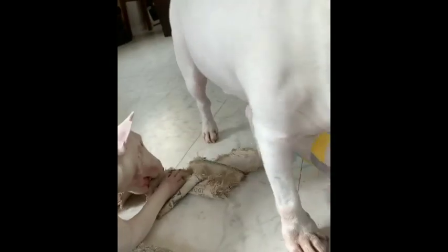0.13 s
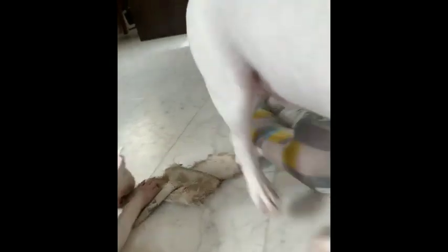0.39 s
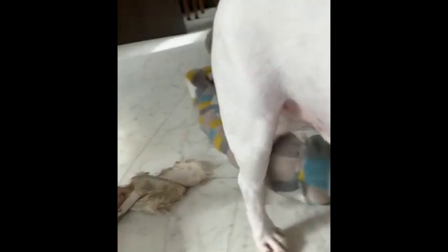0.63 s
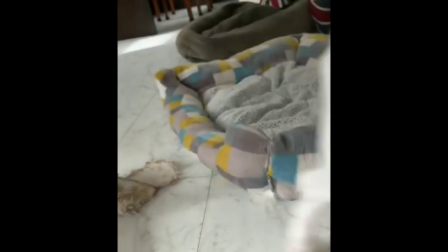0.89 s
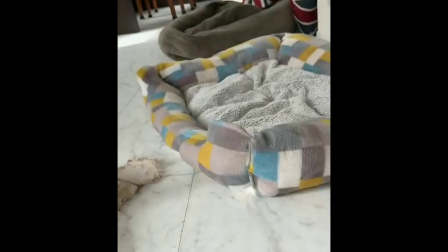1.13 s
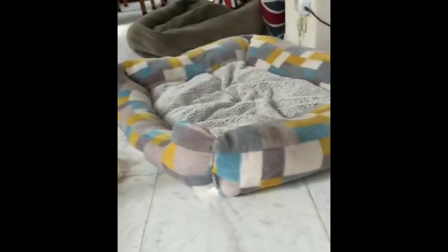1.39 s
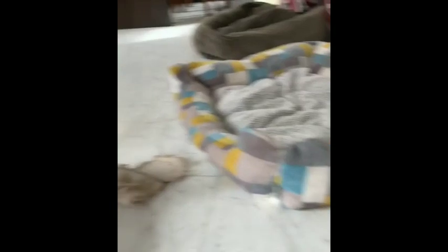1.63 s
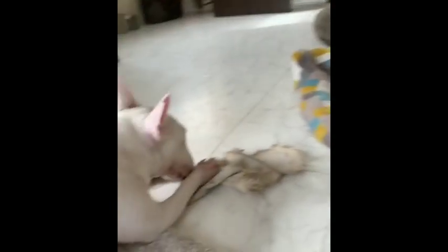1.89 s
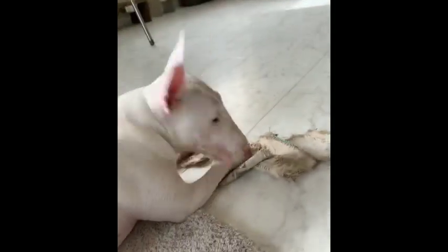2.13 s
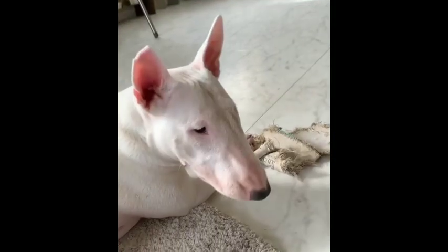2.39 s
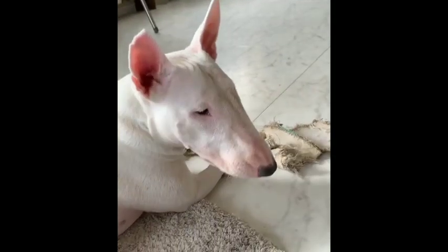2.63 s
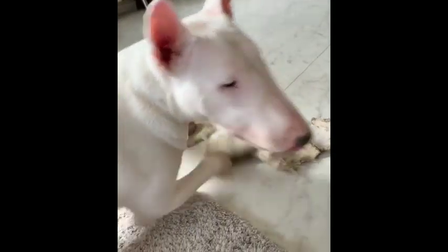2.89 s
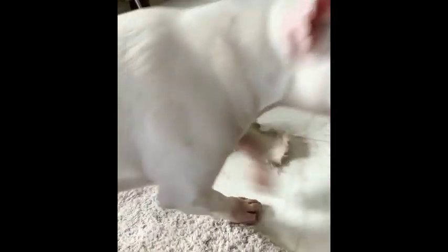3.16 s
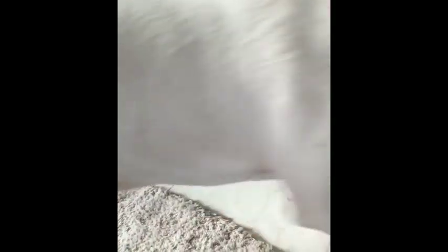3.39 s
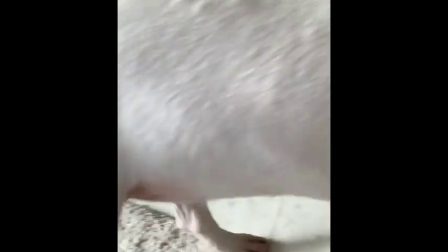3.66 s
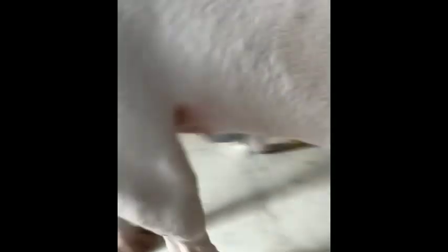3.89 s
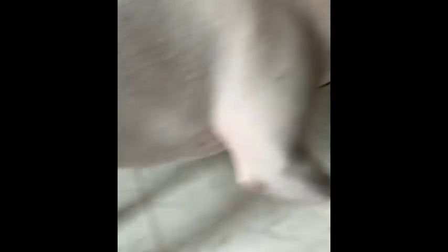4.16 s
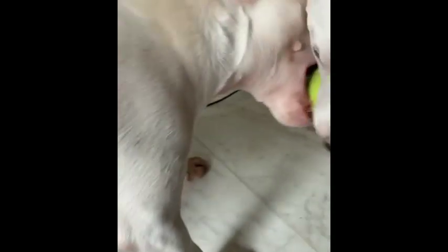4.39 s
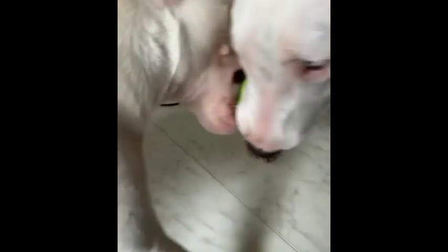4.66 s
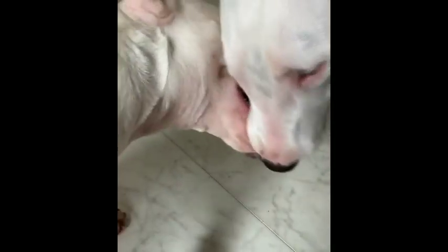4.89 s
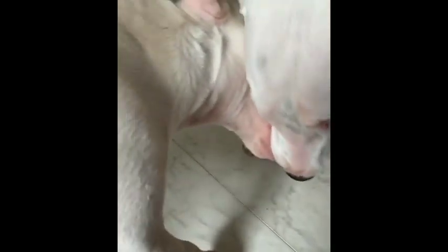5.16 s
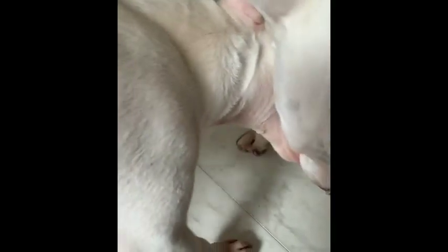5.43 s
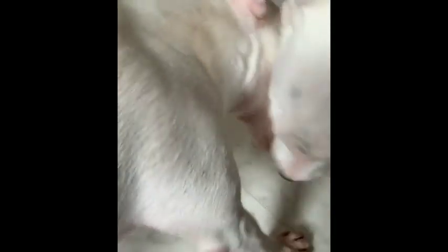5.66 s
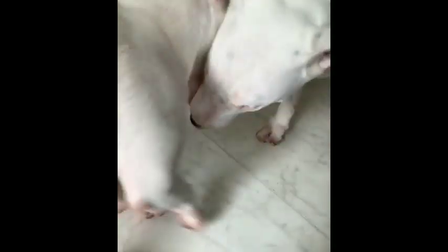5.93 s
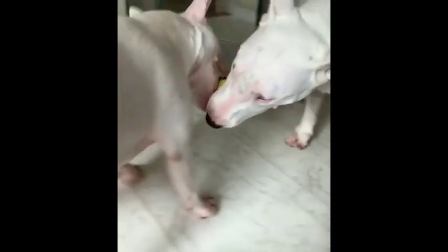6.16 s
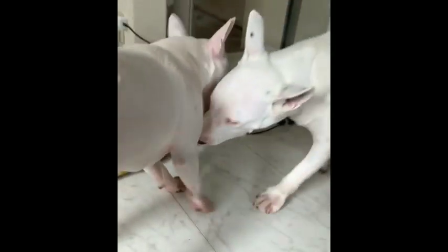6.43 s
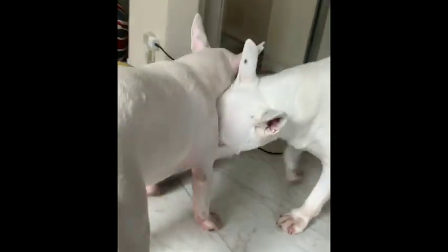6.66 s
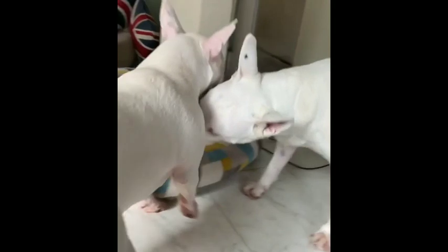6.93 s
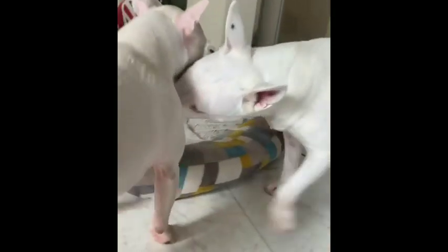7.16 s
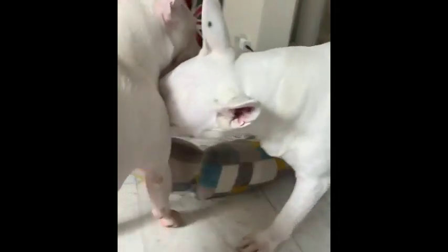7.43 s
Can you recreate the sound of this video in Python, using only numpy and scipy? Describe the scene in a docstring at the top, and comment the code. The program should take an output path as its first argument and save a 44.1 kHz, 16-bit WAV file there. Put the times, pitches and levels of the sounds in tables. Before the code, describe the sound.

Two dogs scuffle on a hard indoor floor, claws ticking and paws scuffing and thudding, with soft huffs, a nasal grunt and a brief rough growl.

```python
"""Two dogs scuffle on a stone floor in a living room, under steady room tone, brushing fur and rustling bedding.
First claws (short noise through resonances) tick over scuffs (grain noise) and thuds (sagging sines), with huffs
(breath noise and loose slaps through a snout); a sparser spell ends in a hard thud just after 3 s.
A nasal grunt (rough hum) comes at 4.1 s, then hard claw clusters; from 5.1 to 5.5 s one dog growls in rough
throbs (slaps and air bursts through throat and chest); bright claw clusters, scuffs and thuds run to the end."""
import sys
import numpy as np
from scipy import signal
from scipy.fft import rfft, irfft, next_fast_len
from scipy.io import wavfile

SR = 44100
rng = np.random.default_rng(int(sys.argv[2]) if len(sys.argv) > 2 else 0)


def level_to_linear(level):
    """Convert decibel levels to linear amplitude factors, elementwise."""
    exponent = np.asarray(level, float) / 20
    return 10 ** exponent


def store_wav(level_fs):
    """Save 16-bit WAV to argv[1]."""
    pcm = np.round(np.clip(np.atleast_2d(level_fs), -1, 1) * 32767)
    wavfile.write(sys.argv[1], SR, pcm.T.astype(np.int16))


N = 332955

# Chest resonances. Each row: frequency in Hz, width in Hz, level in dB.
CHEST_MODES = [(79, 39.5, -3), (135, 76, -1), (200, 78, -2), (314, 47, -8.5), (486, 68, -11)]


def rms_one(x):
    """Scale to rms 1."""
    return x / np.sqrt(np.mean(x ** 2) + 1e-20)


def in_time(rows, outside=None):
    """Columns of a curve table, one value per sample."""
    s, *columns = np.transpose(rows)
    return [np.interp(np.arange(N) / SR, s, c, outside, outside) for c in columns]


def drift(rate):
    """Slow chance: smooth noise, spread 1, made on every 40th sample."""
    r = np.exp(-80 * np.pi * rate / SR)
    white = rng.standard_normal(N // 40 + 2002)
    slow = signal.lfilter([1], [1, -2 * r, r * r], white)[2000:]
    return np.interp(np.arange(N) / 40, np.arange(len(slow)), rms_one(slow))


def coloured(spectrum, white):
    """Give a white signal the spectrum; rms 1."""
    hz, db = np.transpose(spectrum)
    log_hz = np.log(np.fft.rfftfreq(N, 1 / SR) + 1)
    gain = level_to_linear(np.interp(log_hz, np.log(hz), db, -70, -70))
    return rms_one(irfft(rfft(white) * gain, N))


def resonate(x, hz, width_hz):
    """One resonance, gain 1 on top."""
    r = np.exp(-np.pi * width_hz / SR)
    poles = [1, -2 * r * np.cos(2 * np.pi * hz / SR), r * r]
    return signal.lfilter([(1 - r * r) / 2, 0, (r * r - 1) / 2], poles, x)


def cavity(x, modes):
    """Resonances in parallel, signs alternating."""
    return sum((-1) ** k * level_to_linear(db) * resonate(x, hz, width_hz) for k, (hz, width_hz, db) in enumerate(modes))


def burst(length, rise_s, fall_s):
    """An envelope of height 1 that swells fast and dies away."""
    t = np.arange(length) / SR
    shape = (1 - np.exp(-t / rise_s)) ** 2 * np.exp(-t / fall_s)
    return shape / shape.max()


def add(out, s, piece):
    """Lay a short sound into out at time s."""
    i = round(s * SR)
    out[:, i:i + piece.shape[1]] += piece[:, :N - i]


def room_tone():
    """Steady dark noise whose level wanders slowly."""
    # Each row: frequency in Hz, relative density in dB per Hz.
    tone_spectrum = [(30, -2), (110, 4.5), (250, -1), (500, -15), (900, -30.5), (2000, -40), (3300, -42),
                     (5500, -44), (9000, -41), (13150, -55), (13400, -64)]
    return level_to_linear(-63.5 + 2.6 * drift(4.4)) * coloured(tone_spectrum, rng.standard_normal((2, N)))


def room(x):
    """Eight feedback delays a side, duller on every round."""
    low_t60_s, wall_cut_hz = 0.4, 4000
    size = next_fast_len(N + SR)
    w = 2 * np.pi * np.fft.rfftfreq(size)
    dull = 1 / (1 + 1j * w * SR / (2 * np.pi * wall_cut_hz))
    echo = np.zeros((2, len(w)), complex)
    for k, lag in enumerate(rng.uniform(0.0098, 0.04, 16) * SR):
        loop = level_to_linear(-60 * lag / SR / low_t60_s) * dull ** 0.49 * np.exp(-1j * w * lag)
        echo[k % 2] += (-1) ** (k // 2) * loop / (1 - loop)
    return irfft(rfft(x, size) * echo, size)[:, :N]


def friction(spectrum, level_db, grain_db, lumpy_db, patchy_db, lumps_per_s, count):
    """Dense grains of uneven size, coming in lumps; count bands an octave each swell and fade on their own."""
    sizes = level_to_linear(grain_db * np.minimum(rng.exponential(1, N), 5))
    grains = rfft(coloured(spectrum, sizes * rng.standard_normal((2, N))))
    band = count * np.log2(np.fft.rfftfreq(N, 1 / SR) + 1)
    first, last = np.round(count * np.log2([spectrum[0][0], spectrum[-1][0]]))
    patches = 0
    for k in np.arange(first, last + 1, 1):
        one_band = irfft(grains * np.clip(1 - abs(band - k), 0, 1), N)
        patches = patches + level_to_linear(patchy_db * drift(15.3)) * one_band
    return level_to_linear(level_db + lumpy_db * drift(lumps_per_s)) * patches


def shuffle():
    """Bodies shifting their weight: low friction noise."""
    # Each row: frequency in Hz, relative density in dB per Hz.
    shuffle_spectrum = [(25, -71), (45, -11), (70, 2), (110, -1), (200, -1.5), (300, -11.5), (450, -5.5),
                        (700, -27), (1200, -87)]
    # Each row: time in seconds, level in dB before lumps and patches.
    shuffle_levels = [(0.0, -59), (0.635, -58.5), (0.99, -61.5), (1.67, -55.5), (2.58, -60), (3.13, -57.5),
                      (4.055, -56), (4.165, -56.5), (4.55, -58.5), (4.94, -57), (5.025, -53),
                      (6.165, -53.5), (6.545, -57.5), (7.545, -53.5)]
    return friction(shuffle_spectrum, in_time(shuffle_levels)[0],
                    grain_db=3.0, lumpy_db=2.2, patchy_db=1.8, lumps_per_s=12, count=2)


def rustle(scuff_power):
    """Bedding and skin: mid-band friction, stirred further by each scuff."""
    # Each row: frequency in Hz, relative density in dB per Hz.
    rustle_spectrum = [(300, -4), (600, 11.5), (1000, 7.5), (1500, 3.5), (2200, -1.5), (4000, -101)]
    # Each row: time in seconds, level in dB before scuffs, lumps and patches.
    rustle_levels = [(0.0, -72.5), (0.765, -61), (1.365, -66), (1.6, -54.5), (1.775, -72), (1.93, -69.5),
                     (2.905, -69.5), (3.75, -66), (4.345, -71.5), (4.8, -70), (5.57, -61), (6.29, -67),
                     (6.89, -65.5), (7.15, -70), (7.545, -62)]
    per_scuff_db = -7.5
    power = level_to_linear(2 * per_scuff_db) * scuff_power[0] + level_to_linear(2 * in_time(rustle_levels)[0])
    return friction(rustle_spectrum, 10 * np.log10(power),
                    grain_db=4.5, lumpy_db=2.2, patchy_db=4.0, lumps_per_s=45, count=4)


def scuffing():
    """Each scuff swells quickly, sags while the pad slides, then lets go: coarse and fine level as power."""
    # Pads sliding on stone. Each row: start of slide in seconds, coarse level in dB, fine level in dB,
    # length in seconds.
    slides = [(0.118, -56, -70, 0.015), (0.78, -57.5, -62.5, 0.025), (0.95, -59, -81, 0.013),
              (1.081, -57.5, -90, 0.058), (1.256, -63, -61.5, 0.18), (1.437, -57.5, -70, 0.18),
              (1.569, -63, -61, 0.02), (2.173, -64.5, -74.5, 0.077), (2.43, -63.5, -76, 0.23),
              (2.724, -62, -79, 0.013), (2.993, -46, -47, 0.048), (3.1, -56, -60, 0.075),
              (3.399, -57.5, -60, 0.054), (3.605, -56.5, -60.5, 0.11), (3.777, -54.5, -62, 0.071),
              (4.029, -62.5, -55, 0.19), (4.409, -54, -48.5, 0.23), (4.68, -50, -47, 0.036),
              (5.312, -57.5, -60.5, 0.53), (5.844, -45, -44.5, 0.011), (5.897, -59.5, -51, 0.12),
              (6.149, -55.5, -74, 0.014), (6.857, -52.5, -75, 0.01), (7.023, -60.5, -69, 0.048),
              (7.188, -53, -56, 0.047), (7.394, -53, -63, 0.043)]
    rise_db_per_s, sag_db_per_s, release_db_per_s = 614, 24.5, 200
    t, power = np.arange(N) / SR, 0
    for s, coarse_db, fine_db, length_s in slides:
        length_s = abs(length_s)
        rise_db = rise_db_per_s * np.maximum(s - t, 0)
        sag_db = sag_db_per_s * np.clip(t - s, 0, length_s)
        release_db = release_db_per_s * np.maximum(t - s - length_s, 0)
        shape_db = np.maximum(-(rise_db + sag_db + release_db), -150)
        power = power + level_to_linear(2 * np.array([[coarse_db], [fine_db]])) * level_to_linear(2 * shape_db)
    return power


def brushed(scuff_power):
    """Fur brushes on between the scuffs: joint coarse and fine level in dB."""
    # Each row: time in seconds, coarse level in dB, fine level in dB.
    brush_levels = [(0, -66, -72), (0.53, -67, -67), (0.75, -65, -79), (1.6, -76, -86),
                    (1.735, -85.5, -80.5), (2.15, -75, -82), (2.4, -108, -86), (2.9, -75, -81),
                    (4.35, -67, -71.5), (4.9, -72, -64.5), (5.125, -66.5, -68.5), (5.23, -71.5, -76.5),
                    (5.6, -72, -62), (5.8, -55, -53), (5.95, -63.5, -58.5), (6.4, -64.5, -67.5),
                    (6.85, -64.5, -60.5), (7.15, -67.5, -70.5), (7.545, -61.5, -62.5)]
    return 10 * np.log10(scuff_power + level_to_linear(2 * np.array(in_time(brush_levels))))


def scuff(coarse_db, fine_db):
    """Pads and fur rub the stone: coarse, patchy grains and a finer hiss."""
    # Each row of both: frequency in Hz, relative density in dB per Hz.
    coarse_spectrum = [(800, -5.5), (1500, 2.5), (3000, 6.5), (4500, 1.5), (6500, -3.5)]
    fine_spectrum = [(4000, -6.5), (6000, -3.5), (7500, -1.5), (9500, -1.5), (12500, -2.5), (13150, 5),
                     (13400, -57)]
    coarse = friction(coarse_spectrum, coarse_db,
                      grain_db=5.5, lumpy_db=1.8, patchy_db=5.0, lumps_per_s=40, count=5)
    fine = friction(fine_spectrum, fine_db,
                    grain_db=2.5, lumpy_db=0.0, patchy_db=3.0, lumps_per_s=80, count=4)
    return coarse + fine


def grit(level_db, per_s):
    """Lone grains under the pads snap, each ringing a few cycles at one of twelve pitches."""
    sizes = level_to_linear(level_db + 1.7 * np.minimum(rng.exponential(1, N), 4)) * (rng.random(N) < per_s / SR)
    dealt = rng.integers(0, 12, N)
    pitches_hz = np.geomspace(1300, 4600, num=12)
    return sum(resonate(sizes * (dealt == k) + 1e-18, hz, 90) for k, hz in enumerate(pitches_hz))


def thuds():
    """A landing swings floor and body a few cycles; a harder one swells faster and sags more in pitch."""
    # Paws and bodies. Each row: time in seconds, level in dB, nominal pitch in Hz (settles at 0.921 of it),
    # t60 in seconds.
    landings = [(0.543, -41.5, 230, 0.036), (1.424, -48, 104, 0.072), (1.579, -43, 126, 0.21),
                (1.708, -44, 118, 0.047), (2.725, -39.5, 141, 0.1), (3.11, -23.5, 117, 0.051),
                (3.459, -40.5, 83, 0.079), (3.635, -38.5, 125, 0.092), (3.809, -41, 190, 0.061),
                (4.688, -36.5, 85.8, 0.16), (5.003, -37.5, 134, 0.033), (5.859, -37.5, 114.4, 0.13),
                (6.059, -39, 64.7, 0.25), (6.17, -37, 79, 0.11), (6.29, -44, 70.4, 0.19),
                (6.418, -45, 69.5, 0.094), (7.031, -43.5, 137, 0.32), (7.402, -41, 200, 0.052),
                (7.443, -36.5, 101, 0.089)]
    out, t = np.zeros((2, N)), np.arange(9000) / SR
    for s, peak_db, hz, t60_s in landings:
        force = np.clip((peak_db + 57.5) / 28, 0.1, 1)
        turns = hz * (0.921 * t + 1.35 * force * 0.0058 * (1 - np.exp(-t / 0.0023)))
        swing = np.sin(2 * np.pi * turns) * burst(9000, 0.0023 / force, abs(t60_s) / np.log(1000))
        add(out, s + 0.004, level_to_linear(peak_db) * np.stack([swing, swing]))
    return out


def grunt():
    """A short rough closed-mouth hum through the nose, with its octave above."""
    # Each row: time in seconds, level in dB, mean pitch of the hum in Hz.
    hum_track = [(4.07, -63, 200), (4.1, -51, 188.8), (4.13, -58, 253.2), (4.16, -46.5, 272.3),
                 (4.235, -48, 197), (4.26, -75, 182)]
    level_db, hum_hz = in_time(hum_track)
    inside = in_time([(hum_track[0][0], 1), (hum_track[-1][0], 1)], outside=0)[0]
    turns = np.cumsum(hum_hz * (1 + 0.08 * drift(35))) / SR
    uneven = in_time([(4.17, 0.24), (4.22, 0.83)])[0]   # strong-weak slaps creep in: a half-pitch line
    hum = np.sin(2 * np.pi * turns) + level_to_linear(-9.0) * np.sin(4 * np.pi * turns) + uneven * np.sin(np.pi * turns)
    return inside * level_to_linear(level_db + 3.9 * drift(34)) * rms_one(hum)


def folds(hz, jitter, breath):
    """Vocal folds slapping unevenly, with a puff of noise after each slap."""
    phase = np.cumsum(hz * (1 + jitter * drift(60))) / SR
    slaps = np.diff(np.floor(phase), prepend=0) * level_to_linear(1.5 * rng.standard_normal(N))
    puffs = rng.standard_normal((2, N)) * signal.lfilter([1], [1, -0.99], slaps)
    return rms_one(slaps) + breath * rms_one(puffs)


def effort(calls, sag):
    """Each call swells to its loudest, sags, and is cut off: throat and chest level in dB."""
    rise_db, cut_s = 9.5, 0.037
    throat_sag_db_per_s, chest_sag_db_per_s = sag * 88, 46
    rows = []
    for start, top, end, throat_db, chest_db in calls:
        throat_end = throat_db - throat_sag_db_per_s * (end - top)
        chest_end = chest_db - chest_sag_db_per_s * (end - top)
        rows += [(start - 0.01, -120, -120),
                 (start, throat_db - rise_db, chest_db - rise_db),
                 (top, throat_db, chest_db),
                 (end, throat_end, chest_end),
                 (end + cut_s, throat_end - 20, chest_end - 20),
                 (end + cut_s + 0.002, -120, -120)]
    return in_time(sorted(rows), outside=-120)


def voice(source, calls, tract, sag=1):
    """A source rung through an airway and the chest."""
    throat_db, chest_db = effort(calls, sag)
    band = signal.butter(2, [420, 3500], "band", fs=SR, output="sos")
    throat = signal.sosfilt(band, cavity(source, tract))
    return level_to_linear(throat_db) * rms_one(throat), level_to_linear(chest_db) * rms_one(cavity(source, CHEST_MODES))


def huff():
    """Softer, lower calls of the other dog: mostly fluttering breath through the snout, with loose slaps."""
    # Each row: start, loudest and end in seconds, throat level in dB, chest level in dB.
    huff_calls = [(0.509, 0.57, 0.8, -47, -51), (1.515, 1.519, 1.56, -54, -54.5),
                  (1.858, 1.9, 2.03, -58.5, -59.5)]
    # Each row: frequency in Hz, width in Hz, level in dB.
    snout_modes = [(587, 320, -5), (1090, 70, 6), (1450, 320, -11.5), (2200, 170, -16)]
    throat, chest = voice(folds(110, jitter=0.12, breath=3.5), huff_calls, snout_modes, sag=0.77)
    return throat * level_to_linear(1.8 * drift(33)) + chest


def growl():
    """Irregular slaps ring throat and chest; air comes in uneven throbs, coloured by how wide the mouth is."""
    # Each row: start, loudest and end in seconds, throat level in dB, chest level in dB.
    growl_calls = [(5.06, 5.074, 5.195, -46.5, -40), (5.233, 5.271, 5.54, -40.5, -37.5)]
    # Each row: frequency in Hz, width in Hz, level in dB.
    throat_modes = [(500, 90, -7), (780, 70, 1), (1010, 80, -1), (1280, 70, 2), (1620, 60, -2),
                    (1850, 80, -7), (2280, 130, -9)]
    # Gulps of air through the mouth. Each row: time in seconds, level in dB, mouth resonance in Hz.
    throbs = [(5.066, -30.5, 1100), (5.097, -32, 1100), (5.129, -29.5, 1238), (5.171, -37.5, 2250),
              (5.185, -32.5, 1268), (5.235, -29, 1283), (5.245, -28, 1576), (5.269, -27.5, 1470),
              (5.281, -21, 1284), (5.301, -29, 1620), (5.314, -26.5, 1180), (5.335, -25.5, 1350),
              (5.361, -29.5, 1434), (5.405, -33.5, 1320), (5.489, -38.5, 1320), (5.53, -39, 1320)]
    throat, chest = voice(folds(120, jitter=0.1, breath=0.55), growl_calls, throat_modes)
    out = throat * level_to_linear(2.5 * drift(45)) + chest * level_to_linear(2.5 * drift(38))
    lips = signal.butter(4, 3100, fs=SR, output="sos")
    push = cavity(burst(2500, 0.00054, 0.0011), CHEST_MODES)
    push = level_to_linear(-7.0) * push / np.abs(push).max()
    for s, db, mouth_hz in throbs:
        flow = burst(2500, 0.0005, 0.0035) * rng.standard_normal((2, 2500))
        flow = flow * level_to_linear(2.0 * rng.standard_normal(2500))
        flow[:, 20] += 22   # the folds clap open
        mouth = resonate(resonate(flow, mouth_hz, 200), mouth_hz, 80)
        hiss = resonate(flow, 2400, 800)
        throb = rms_one(cavity(flow, throat_modes)) + level_to_linear(3) * rms_one(mouth) + level_to_linear(-12) * rms_one(hiss)
        throb = signal.sosfilt(lips, throb)
        add(out, s - 0.001, level_to_linear(db) * (throb / np.abs(throb).max() + push))
    return out


def claws():
    """Each tick is milliseconds of crackle: a bright, unevenly ringing spray plus the ring of the nail."""
    # Claws on stone. Each row: time in seconds, peak in dB, nail ring in Hz, spray over nail in dB.
    ticks = [(0.1239, -32, 2200, -4), (0.191, -43, 5140, 4), (0.424, -42, 2370, -15), (0.508, -42, 2350, 4),
             (0.649, -26.5, 2470, 5), (0.705, -36, 2200, -12), (0.777, -36.5, 2320, -8),
             (0.784, -37, 2200, -4), (0.835, -36, 2140, -17), (0.947, -38.5, 2240, -3),
             (0.9714, -31.5, 6740, 1), (1.081, -28, 3194, -6.5), (1.1417, -36, 1610, 8),
             (1.255, -38.5, 1500, -2.5), (1.4333, -37, 2040, -12), (1.453, -37, 4720, -25),
             (1.513, -33.5, 963, -11), (1.5823, -33, 1450, -10), (2.213, -43, 1500, -20),
             (2.424, -40, 3340, -31), (2.5006, -43.5, 3470, -30), (2.989, -38.5, 1510, -18),
             (3.108, -29, 5800, 18), (3.1107, -30.5, 3200, 6.5), (3.166, -42.5, 6740, -15),
             (3.3892, -35, 1460, -29), (3.603, -38.5, 1125, -22), (3.712, -23.5, 6600, 14),
             (3.7845, -28, 3820, 4), (3.863, -38.5, 1200, -13), (3.947, -45.5, 6540, 0),
             (4.0097, -35.5, 4000, 1.5), (4.0402, -31.5, 7100, 23), (4.082, -39, 1244, -4),
             (4.152, -35.5, 6170, 17), (4.207, -37, 6470, 4), (4.404, -16.5, 6700, 23),
             (4.4126, -16.5, 2570, 8), (4.67, -20.5, 8090, 20), (4.6767, -16, 7800, 6),
             (4.6835, -15.5, 2970, 31), (4.6987, -19, 6500, 3), (4.7073, -24.5, 6650, 1),
             (5.763, -37, 1300, -8), (5.833, -13.5, 6700, 7), (5.8397, -16, 7440, 8),
             (5.8504, -24, 3440, 1), (5.8656, -23, 7000, 10), (6.1476, -19, 6170, 7),
             (6.1531, -13.5, 2340, 16), (6.293, -39.5, 6550, 9), (6.309, -36, 2150, -0.5),
             (6.635, -49, 3600, -12), (6.8493, -24, 8550, 10), (6.86, -19, 4410, 0),
             (7.0687, -33.5, 3120, -19), (7.1814, -12.5, 8500, 19), (7.1899, -13, 2280, 11),
             (7.333, -33, 2140, -8.5), (7.3957, -26, 6500, 4), (7.4027, -17.5, 4060, -2),
             (7.419, -32, 1950, -27)]
    out = np.zeros((2, N))
    bright = signal.butter(2, 1800, "high", fs=SR, output="sos")
    shape = burst(1500, 0.0012, 0.0011) + level_to_linear(-26) * burst(1500, 0.002, 0.006)
    for s, peak_db, hz, bright_db in ticks:
        crackle = shape * rng.standard_normal((2, 1500)) * level_to_linear(4.2 * rng.standard_normal(1500))
        nail = resonate(crackle, hz, 0.065 * hz)
        nail = nail + level_to_linear(-7) * resonate(crackle, hz * rng.uniform(1.24, 2.2), 0.05 * hz)
        spray = signal.sosfilt(bright, crackle)
        rings = sum(resonate(spray, ring_hz, 300) for ring_hz in rng.uniform(2000, 12000, size=7))
        spray = spray + level_to_linear(12) * rings
        tick = rms_one(nail) + level_to_linear(bright_db) * rms_one(spray)
        add(out, s - 0.0012, level_to_linear(peak_db) * tick / np.abs(tick).max())
    return out


def scene():
    """All sources, as they reach the two sides of the phone."""
    room_db = -20
    scuff_power = scuffing()
    coarse_db, fine_db = brushed(scuff_power)
    near = claws() + thuds() + growl() + huff() + grunt() + grit(coarse_db + 23.5, per_s=350)
    rubbing = shuffle() + rustle(scuff_power) + scuff(coarse_db, fine_db)
    return near + level_to_linear(room_db) * room(near) + rubbing + room_tone()


def low_pass(x):
    """Removes everything above the highest recorded frequency."""
    return signal.sosfilt(signal.butter(12, 14380, fs=SR, output="sos"), x)


def record(dry):
    """The right port hears a phase-turned share of what the left hears; the top is cut."""
    # The two ports. Each row: frequency in Hz, lead of the right port in radians, likeness from 0 to 1.
    ports = [(0, 0, 1), (248, 0.84, 0.86), (660, 3.0, 0.66), (1200, 1.93, 0.47), (2390, 2.5, 0.93),
             (4060, 3.5, 0.08), (4330, 3.5, 0.68), (6800, 1, 0.68), (7130, -0.3, 0.88), (9500, -3.0, 0.93),
             (10080, -3.5, 0.72), (11780, -5, 1), (21900, -9.5, .97)]
    cutoff_hz = 12590
    hz, lead, alike = np.transpose(ports)
    grid_hz = np.fft.rfftfreq(N, 1 / SR)
    lead = np.interp(grid_hz, hz, lead)
    alike = np.clip(np.interp(grid_hz, hz, alike), 0, 1)
    left, other = rfft(dry)
    # below a few hundred Hz a sound common to both sides is not counted twice
    shared = alike * left + np.sqrt(1 - alike ** 2) * (other - left * np.exp(-grid_hz / 300))
    right = shared * np.exp(1j * lead)
    # a 5.8 dB step, then 12 dB per kHz
    top = level_to_linear(-np.clip(grid_hz - cutoff_hz, 0, None) * 0.012 - 5.8 * (grid_hz > cutoff_hz))
    return low_pass(irfft(np.stack([left, right]) * top, N))


dry = scene()
out = record(dry)
store_wav(out)
```